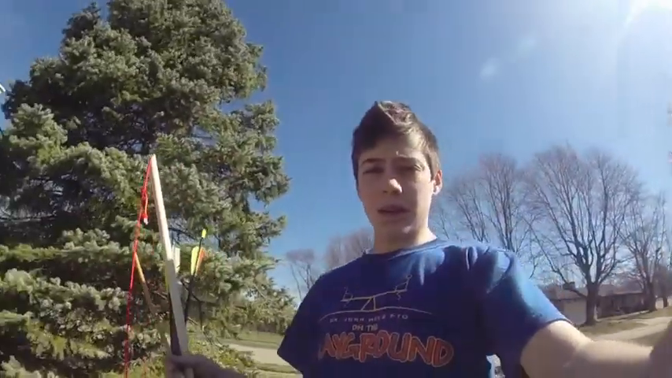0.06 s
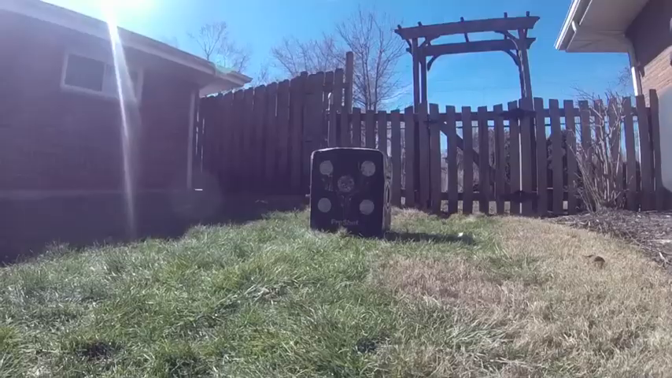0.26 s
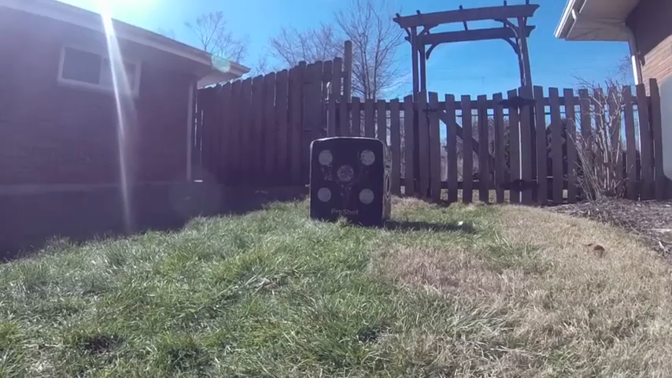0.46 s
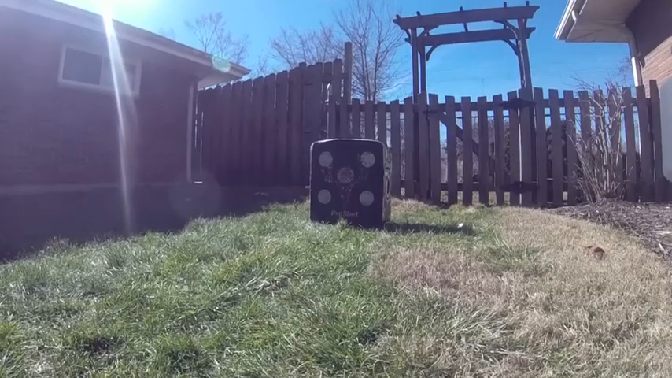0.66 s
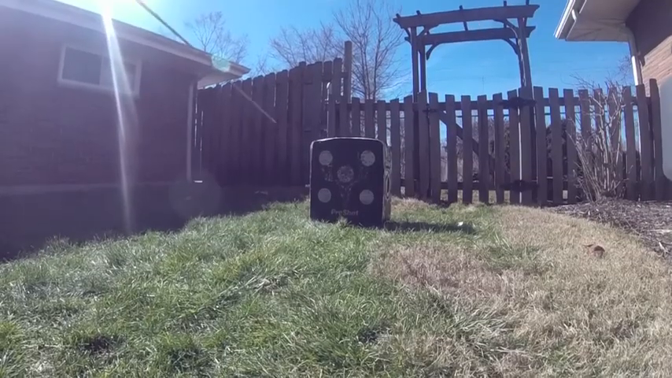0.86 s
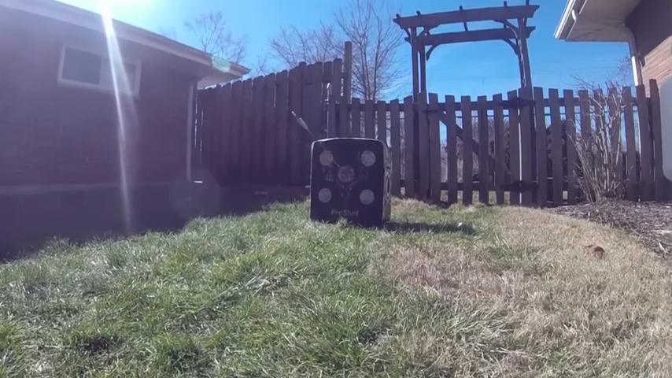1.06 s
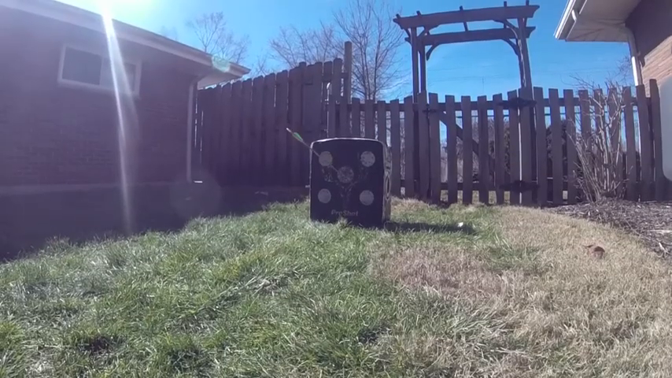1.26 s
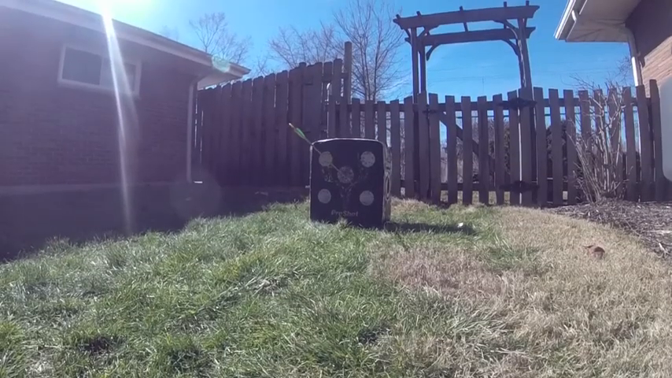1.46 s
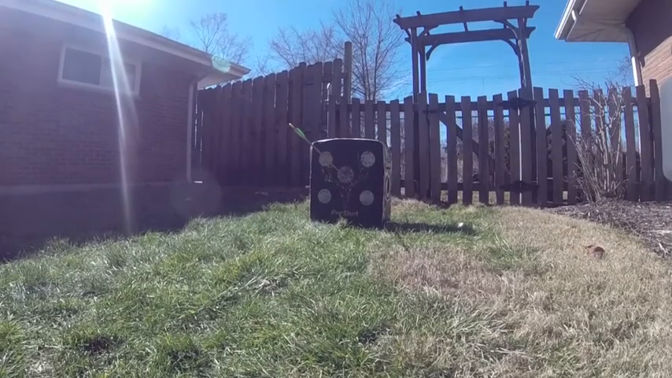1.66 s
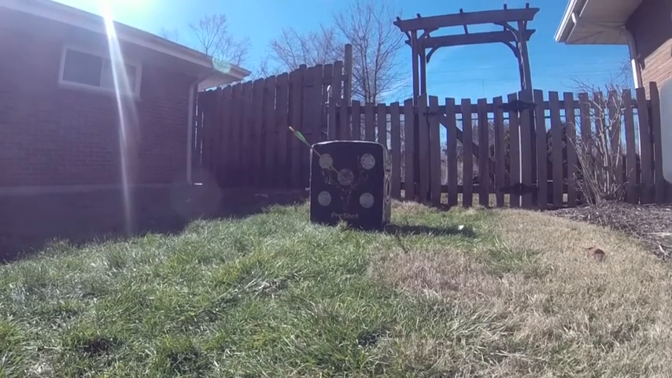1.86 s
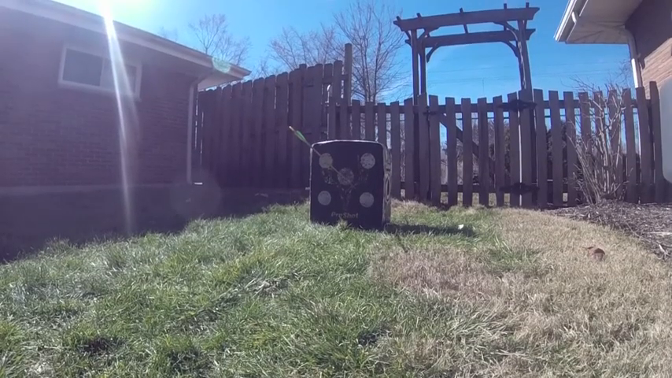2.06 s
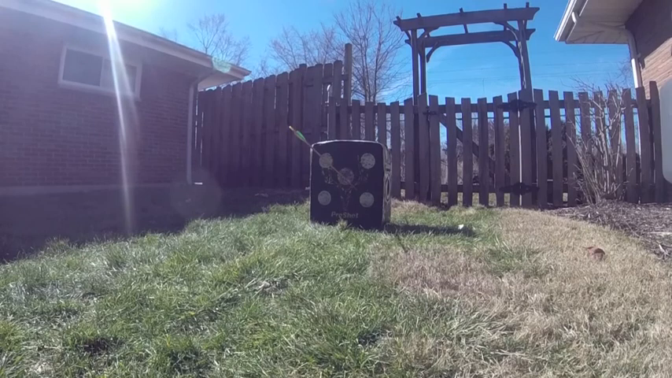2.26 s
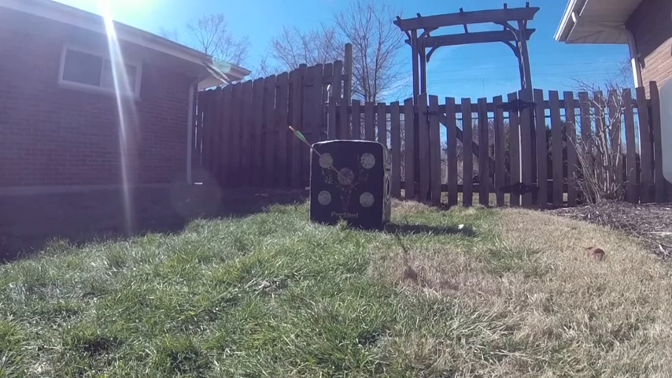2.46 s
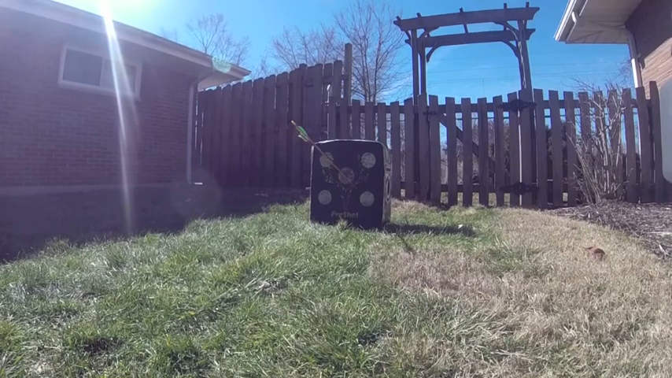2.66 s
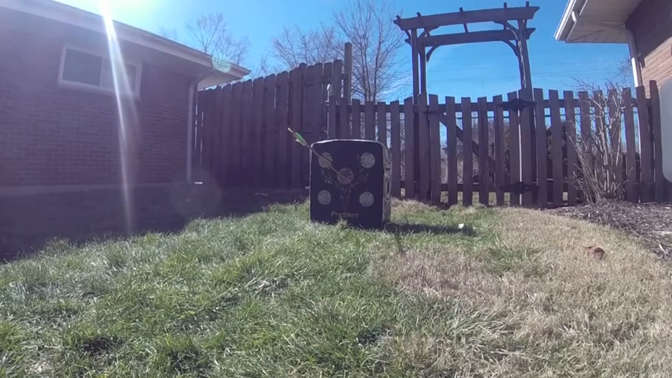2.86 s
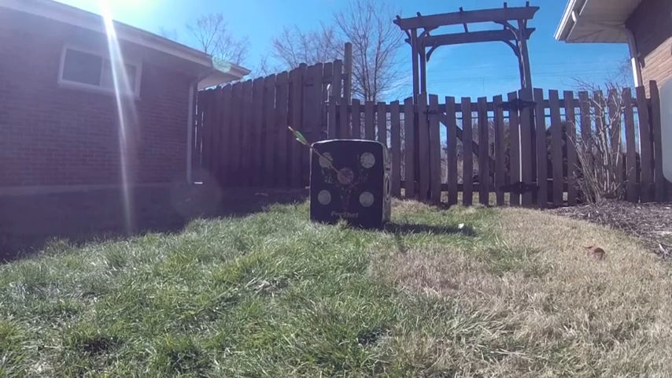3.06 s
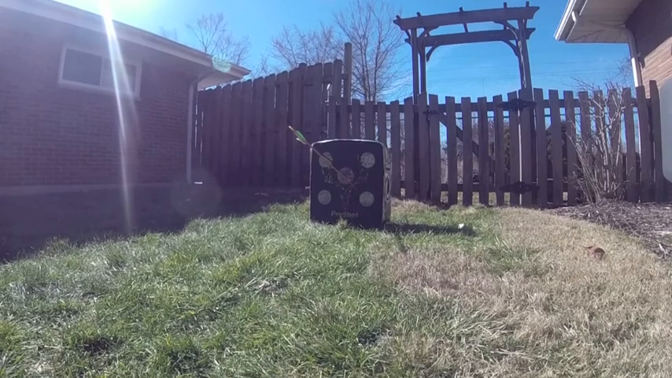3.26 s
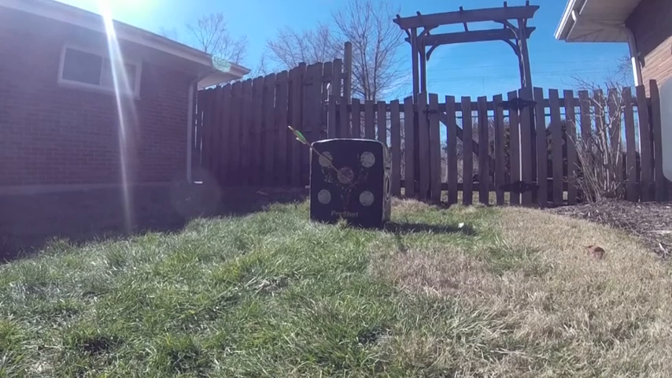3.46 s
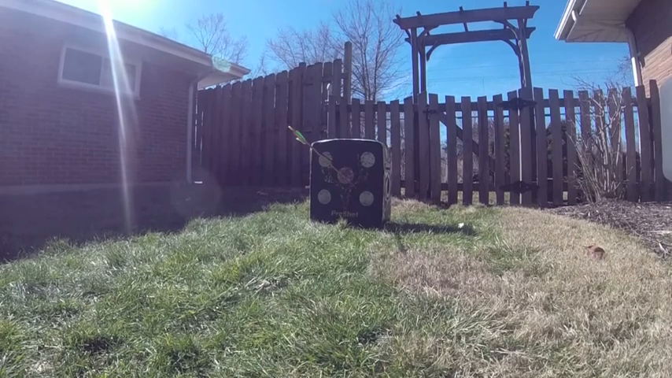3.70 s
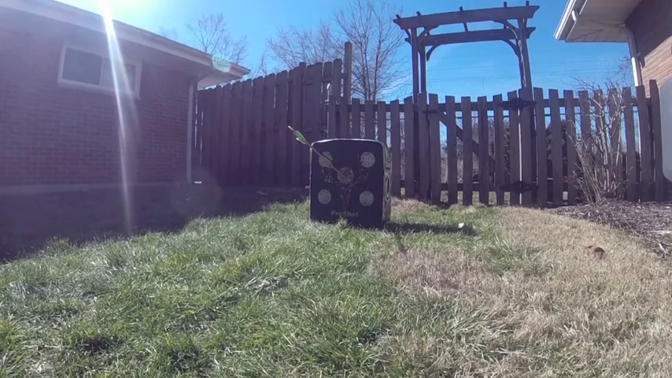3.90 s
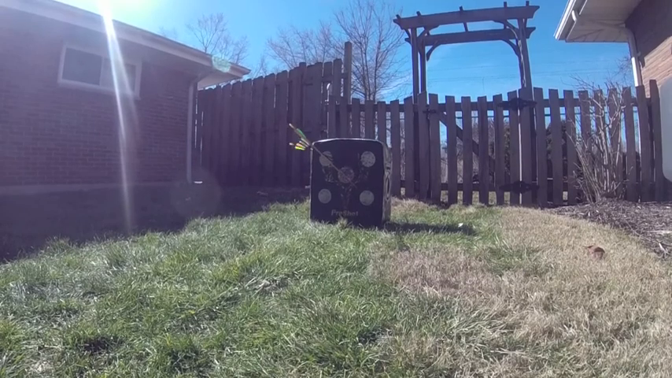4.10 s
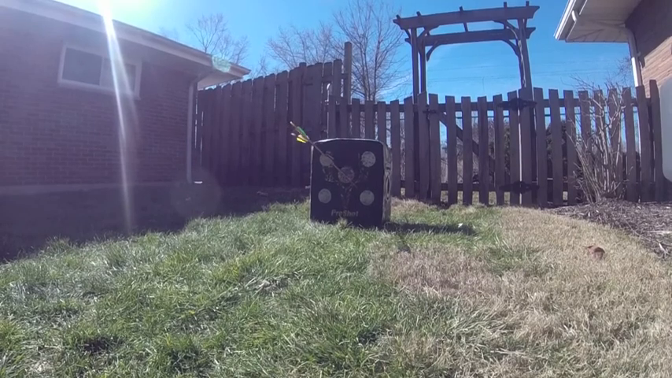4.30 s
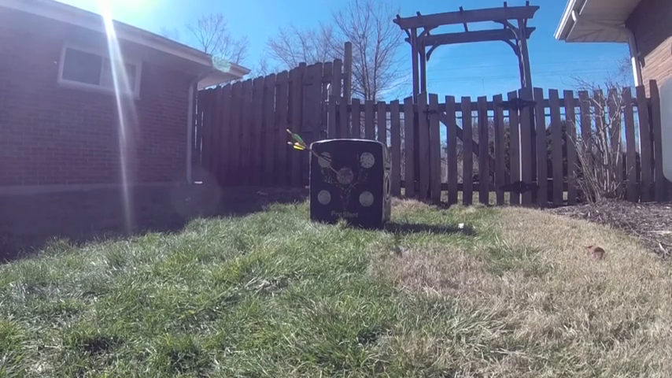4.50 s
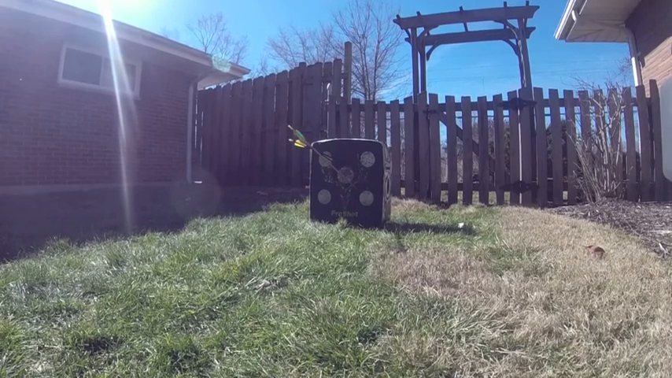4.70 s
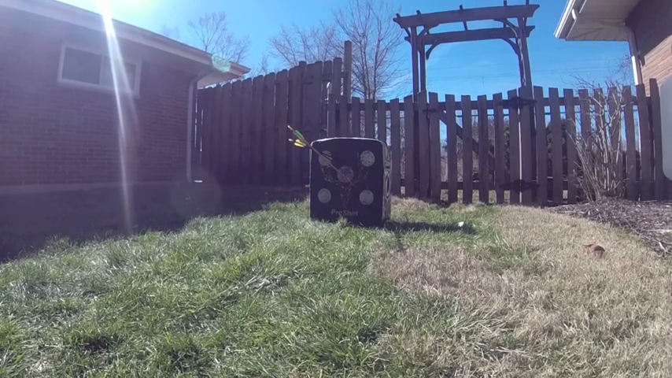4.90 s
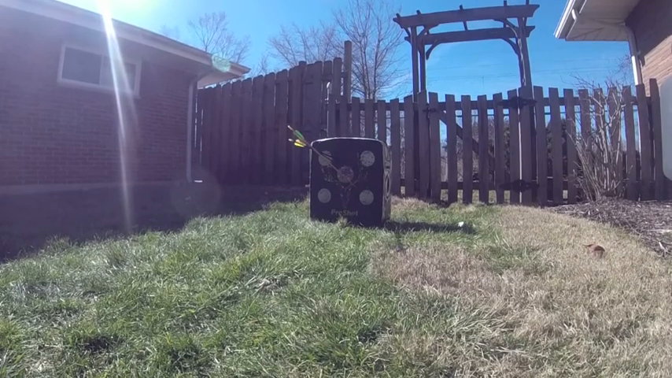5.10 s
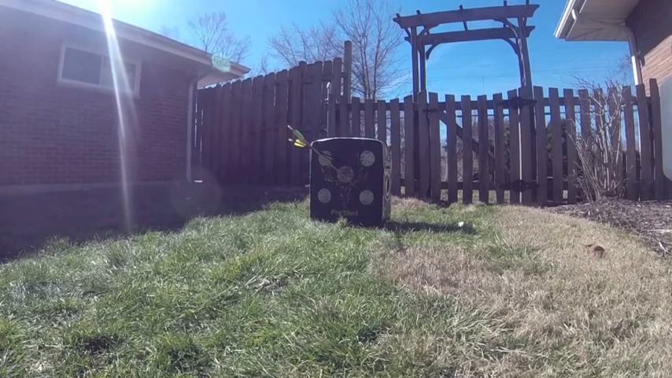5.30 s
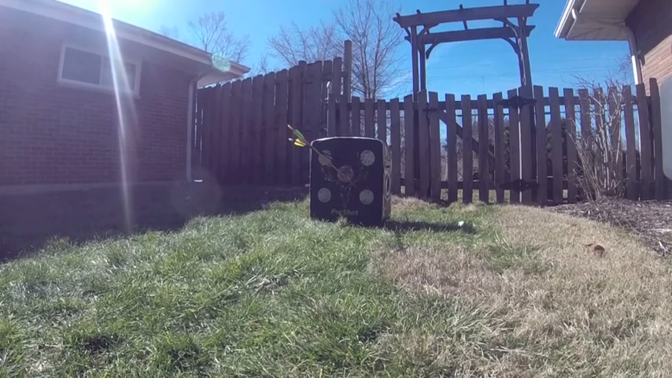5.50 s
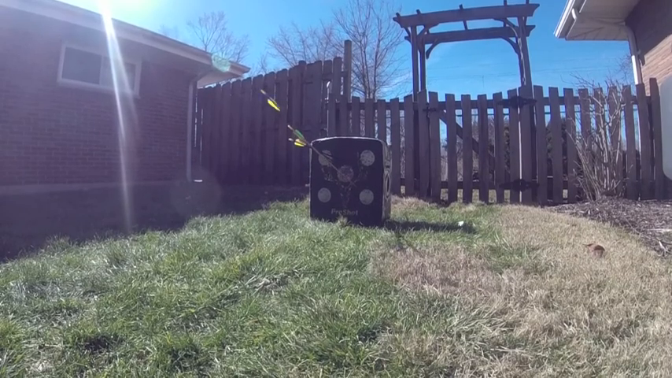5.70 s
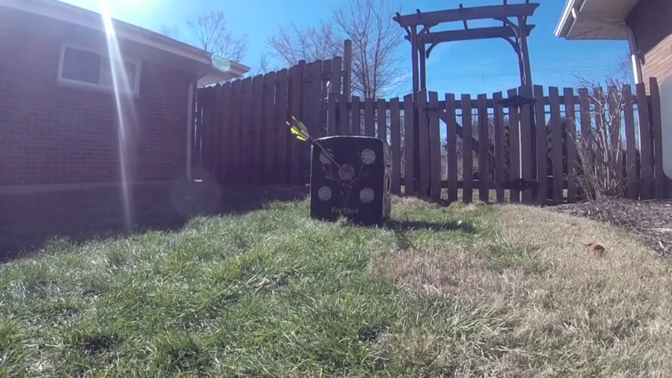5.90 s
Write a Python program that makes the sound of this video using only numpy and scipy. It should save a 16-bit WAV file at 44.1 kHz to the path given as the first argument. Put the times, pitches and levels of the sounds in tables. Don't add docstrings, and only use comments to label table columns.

```python
import sys
import numpy as np
from scipy import signal
from scipy.fft import rfft, irfft
from scipy.io import wavfile
from scipy.ndimage import uniform_filter1d

SR = 44100
rng = np.random.default_rng(int(sys.argv[2]) if len(sys.argv) > 2 else 0)


def pcm_store(signal):
    levels = np.round(np.clip(np.atleast_2d(signal), -1, 1) * 32767)
    wavfile.write(sys.argv[1], SR, levels.astype(np.int16).T)


def invert_db(x):
    u = np.asarray(x, float) / 20
    return 10 ** u


N = 262350

# (time [s], peak level [dB], favoured ring [Hz])
BOW_KNOCKS = [(0.7988, -49, 2650), (0.8203, -35, 3340), (0.8245, -23, 3350), (0.8347, -33, 3060),
              (0.8438, -31, 2300), (0.8535, -27.5, 3500), (0.86, -37, 2770), (2.3915, -36, 2410),
              (2.4001, -26, 1650), (2.4184, -32, 3170), (2.4283, -23, 3160), (2.434, -37, 4700),
              (2.4505, -40, 3040), (2.4614, -44, 4500), (3.9474, -40, 3370), (3.9558, -27.5, 3290),
              (3.9615, -34, 2250), (3.9754, -37, 3360), (3.9853, -35.5, 2150), (4.0044, -46, 2860),
              (5.5734, -48.5, 1620), (5.585, -39.5, 3480), (5.5934, -34.5, 2250), (5.5984, -26, 2160),
              (5.6116, -40, 2320), (5.6214, -41, 2290), (5.6354, -46, 2710)]
# (frequency [Hz], width [Hz], level [dB])
BOW_MODES = [(1330, 190, -16.5), (1650, 194, -6.5), (2210, 210, -0.5), (2750, 310, -1.5), (3416, 197, 3),
             (4026, 300, -11), (4700, 270, -2.5), (5630, 440, -1.5), (5900, 360, -0.5), (6670, 640, -8.5),
             (8380, 1100, -17), (11050, 1500, -21), (12800, 1800, -30)]
KNOCK_MS, HARD_MS_PER_DB = 4.0, .25
SCRAPE_SHARE = .35
BOW_TILT_DB, STRING_RING_HZ = .2, 5500


def bow_release():
    s, db, hz = np.transpose(BOW_KNOCKS)
    gap_ms = np.diff(s, append=9) * 1000
    harder_next = np.diff(db, append=-99) > 0
    scrape_ms = SCRAPE_SHARE * gap_ms * (harder_next & (gap_ms < 30))
    length_ms = KNOCK_MS + HARD_MS_PER_DB * np.clip(db + 32, 0, 8) + scrape_ms
    knocks = [(*row[:3], BOW_TILT_DB, row[3], STRING_RING_HZ) for row in zip(s, db, length_ms, hz)]
    return contacts(knocks, BOW_MODES, rise_ms=0.43, grain_db=3.0, focus_db=5, treble_dies=0.31, abrupt=1.0)


# (time [s], level [dB])
SQUEAK_LEVEL = [(2.399, -56), (2.403, -31.5), (2.412, -27.5), (2.421, -32.5), (2.430, -44), (2.455, -70),
                (2.47, -73)]
# (frequency [Hz], level [dB])
SQUEAK_PARTIALS = [(3167, 0), (3895, -11), (4675, -12), (5480, -17), (2493, -19)]


def squeak():
    t = np.arange(SQUEAK_LEVEL[0][0] * SR // 1, SQUEAK_LEVEL[-1][0] * SR // 1) / SR
    out, tone = np.zeros(N), 0
    for hz, db in SQUEAK_PARTIALS:
        flutter = uniform_filter1d(rng.standard_normal(4096), size=90)[:len(t)]
        partial = np.sin(2 * np.pi * (hz * t + rng.random()))
        tone = tone + invert_db(db + 17 * flutter) * partial
    add(out, t[0], tone * invert_db(np.interp(t, *np.transpose(SQUEAK_LEVEL))))
    return out


# (time [s], peak level [dB], low favoured ring [Hz], high favoured ring [Hz])
FOAM_HITS = [
    (0.9297, -24.5, 3400, 4500),
    (2.5111, -24.5, 1700, 4700),
    (4.0788, -29, 2970, 5200),
    (4.0812, -29.5, 2870, 5360),
    (5.7338, -30, 3050, 4610),
    (5.738, -36, 2750, 4160),
]
# (frequency [Hz], width [Hz], level [dB])
FOAM_SKIN_MODES = [(1300, 1500, -3), (1970, 310, 1.5), (2944, 300, 0.5), (3600, 390, -7),
                   (4410, 500, -11.5), (5600, 520, -11.5), (6700, 570, -22.5), (9100, 2200, -34.5),
                   (12300, 2400, -41.5)]
SMACK_MS, SMACK_TILT_DB = 3.6, 8.0


def foam_smack():
    hits = [(s, db, SMACK_MS, SMACK_TILT_DB, *rings_hz) for s, db, *rings_hz in FOAM_HITS]
    return contacts(hits, FOAM_SKIN_MODES, rise_ms=1.5, grain_db=3.5, focus_db=5.5, treble_dies=0.15, abrupt=1.28)


# (time [s], peak level [dB], first heave of its face [pressure], second heave [pressure])
BLOCK_THUDS = [
    (.929, -42, .036, .003),
    (2.511, -40, .011, .009),
    (4.0795, -40, .009, -.003),
    (5.734, -45, -.013, .006),
]
# (frequency [Hz], width [Hz], level [dB])
BLOCK_MODES = [(85, 57, 0.5), (140, 140, -4.5), (262, 180, -1), (490, 240, -4.5), (895, 300, -3),
               (1400, 540, -18)]
HEAVE_LATE_S, HEAVE_AGAIN_S, HEAVE_RISE_MS, HEAVE_FALL_MS = .009, .004, .68, .56


def block_thuds():
    out, n, heaves = np.zeros(N), np.arange(6000), []
    braking = (n / ms(5.9)) ** 1.62 * np.exp(-n / ms(4.7))
    rocking = 0.2 * np.exp(-n / ms(22.0))
    impact = 0.5 * np.exp(-n / ms(2.5))
    for s, db, first, second in BLOCK_THUDS:
        shoves = signal.lfilter([1], [1, -.9], rng.standard_normal(6000))
        drive = shoves * (braking + rocking + impact)
        sound = resonate([drive], BLOCK_MODES, rng.standard_normal(len(BLOCK_MODES)))
        add(out, s, invert_db(db) * sound / np.abs(sound).max())
        heaves.append((s + HEAVE_LATE_S, first, HEAVE_RISE_MS, HEAVE_FALL_MS))
        heaves.append((s + HEAVE_LATE_S + HEAVE_AGAIN_S, second, HEAVE_RISE_MS, HEAVE_FALL_MS))
    swing_back = signal.butter(2, 110, "high", fs=SR, output="sos")
    return out + signal.sosfilt(swing_back, pushes(heaves))


# (time [s], peak level [dB], favoured ring [Hz])
SHAFT_TAPS = [(0.8994, -34, 3430), (4.1002, -25, 5310), (4.1035, -26, 5320), (4.126, -31, 5210),
              (4.1314, -35, 2850), (4.157, -36.5, 4700), (4.1761, -32.5, 4470), (5.7804, -45, 2910),
              (5.7908, -42, 2800), (5.8084, -43.5, 2900), (5.8305, -34, 4610), (5.8535, -35.5, 5240),
              (5.9225, -37, 5250), (5.9414, -41, 5260)]
# (frequency [Hz], width [Hz], level [dB])
SHAFT_MODES = [(2880, 470, -6.5), (3570, 900, -8), (4600, 610, -2.5), (5300, 290, 1.5), (6040, 670, -7),
               (7100, 990, -14), (8750, 110, -7), (10400, 1800, -23), (12500, 2000, -25.5)]
TAP_MS, TAP_TILT_DB = 3.4, -2.5


def shaft_rattle():
    taps = [(s, db, TAP_MS, TAP_TILT_DB, hz) for s, db, hz in SHAFT_TAPS]
    return contacts(taps, SHAFT_MODES, rise_ms=0.24, grain_db=3.0, focus_db=2.5, treble_dies=0.46, abrupt=1.2)


def walls(x, echo_db, t60):
    n = np.arange(9000)
    onset = np.clip((n - ms(2.5)) / ms(3.8), 0, 1)
    scatter = rng.standard_normal(9000) * invert_db(-60 * n / (t60 * SR)) * onset
    scatter = signal.lfilter([1], [1, -.65], scatter)
    return x + invert_db(echo_db) * signal.fftconvolve(x, scatter / np.linalg.norm(scatter))[:N]


SCENE_CHANGES = [
    .188,
    1.860,
    3.496,
    4.962,
]
FADE_OUT_S, FADE_IN_S = .097, .092


def fades(bend):
    t, gain = np.arange(N) / SR, np.ones(N)
    for s in SCENE_CHANGES:
        gain *= np.clip(np.maximum((s - t) / FADE_OUT_S, (t - s) / FADE_IN_S), 0, 1) ** bend
    return gain * (t > SCENE_CHANGES[0])


# (time [s], pressure, rise [ms], fall [ms])
DOME_SNAPS = [
    (.00366, -0.75, 0.17, 0.165),
    (.0036, -.12, .5, .3),
    (.0043, -0.44, 0.45, 1.44),
    (0.1203, 0.09, 0.11, 0.15),
    (.12904, -0.25, 0.042, .035),
    (.12913, 0.21, 0.044, 0.039),
]
# (time [s], pressure, rise [ms], fall [ms])
FINGER_LIFT = [
    (.1195, -0.052, 6, 1.64),
    (.126, 0.038, 7.1, 14),
]
# (time [s], height, frequency [Hz], t60 [ms])
CAP_RINGS = [
    (.00402, -.5, 2150, 8.5),
    (.00400, -.56, 1680, 5.5),
    (.0036, 0.0082, 2900, 10),
    (0.0052, .02, 1300, 30),
    (.1204, .03, 1900, 5),
    (.1294, 0.045, 2280, 9.6),
    (.1294, 0.017, 1260, 28),
]
# (frequency [Hz], level [dB], t60 [s])
HAND_SWAY = [
    (27.4, -17.6, .18),
    (6.7, -25, .36),
]
SWAY_S = .003
# (frequency [Hz], width [Hz], level [dB])
HOUSING_MODES = [(600, 600, -16.5), (1280, 90, -3.5), (2500, 220, -1), (4400, 2000, -14),
                 (6000, 2000, -16.5), (9000, 4000, -27.5), (13000, 2500, -31.5)]
# (time [s], peak level [dB], length [ms], tilt [dB per octave])
SNAP_CRACKLE = [
    (.0042, -33, 4.5, -13),
    (.1206, -33, 0.86, -7),
    (.1297, -19, .8, 0.1),
]
# (frequency [Hz], width [Hz], level [dB])
SNAP_MODES = [(600, 360, -12), (1300, 300, -4), (2300, 900, -0.5), (3600, 990, -4), (5440, 2500, -1.5),
              (8500, 1800, -6), (13000, 2500, -16)]
DIP_LATE_S, DIP_MS = .006, 4.5
HANDLING_END_S = 0.1738


def handling():
    dips = [(s + DIP_LATE_S, size, DIP_MS, DIP_MS) for s, _, _, size in FINGER_STROKES]
    t, out = np.arange(9000) / SR, pushes(dips + FINGER_LIFT + DOME_SNAPS)[:9000]
    sway = [(SWAY_S, invert_db(db), hz, 1000 * t60) for hz, db, t60 in HAND_SWAY]
    for s, size, hz, t60_ms in CAP_RINGS + sway:
        since = np.maximum(t - s, 0)
        onset = 1 - np.exp(-(since * 6300) ** 2)
        out += size * onset * invert_db(-60000 * since / t60_ms) * np.sin(2 * np.pi * hz * since)
    grains = rng.standard_normal(9000) * invert_db(2.2 * rng.exponential(1, 9000))
    rub = resonate([grains], HOUSING_MODES, np.zeros(len(HOUSING_MODES)))
    out += rubbing(t) * rub / rub.std()
    crackle = contacts(SNAP_CRACKLE, SNAP_MODES, rise_ms=0.06, grain_db=4.0, focus_db=-1, treble_dies=0.49, abrupt=1.2)
    return (np.pad(out, (0, N - 9000)) + crackle) * (np.arange(N) < HANDLING_END_S * SR)


# (start [s], length [s], level [dB], dip of pressure)
FINGER_STROKES = [
    (.023, .027, -54, -.022),
    (.071, .059, -54.5, -.03),
]
RUB_ATTACK_S, RUB_RELEASE_DB_PER_S, RUB_REST_DB = .005, 800, -76


def rubbing(t):
    gain = invert_db(RUB_REST_DB)
    for s, length, db, _ in FINGER_STROKES:
        swell = np.clip((t - s) / RUB_ATTACK_S, 0, 1)
        gain = gain + swell * invert_db(db - RUB_RELEASE_DB_PER_S * np.maximum(t - s - length, 0))
    return gain


# (frequency [Hz], level [dB per Hz])
YARD_SPECTRUM = [(12, -32), (20, -3), (77, 0.5), (183, -3.5), (229, -5), (303, -7), (413, -9), (1340, -15),
                 (2480, -17), (2850, -13.5), (3880, -21.5), (4600, -22), (13300, -38.5), (14900, -41.5),
                 (16200, -63)]
# (frequency [Hz], width [Hz], level [dB])
MIC_PORT = [(2876, 220, 0.2), (4800, 670, 1.2)]
YARD_DB = -58


def yard(patchy_db):
    hz, noise = np.fft.rfftfreq(N, 1 / SR), rfft(rng.standard_normal(N))
    points = np.array(YARD_SPECTRUM)
    noise *= invert_db(np.interp(np.log(hz + 1), np.log(points[:, 0]), points[:, 1]))
    for ring_hz, width, db in MIC_PORT:
        noise *= invert_db(db * np.exp(-((hz - ring_hz) / width) ** 2))
    octave, out = np.log2(hz + 1), 0
    for centre in np.arange(4, 15):
        drift = uniform_filter1d(rng.standard_normal(N // 512 + 2), size=9) * 3
        gain = invert_db(patchy_db * np.interp(np.arange(N) / 512, np.arange(len(drift)), drift))
        band = np.clip(1 - np.abs(octave - centre), 0, 1)
        out = out + gain * irfft(noise * band, N)
    return invert_db(YARD_DB) * out / out.std()


def contacts(events, modes, rise_ms, grain_db, focus_db, treble_dies, abrupt):
    out, n, hz = np.zeros(N), np.arange(4096), np.array(modes)[:, 0]
    for s, db, length_ms, tilt_db, *favoured in events:
        clicks = rng.standard_normal(4096) * invert_db(grain_db * np.minimum(rng.exponential(1, 4096), 4))
        lasting = ms(max(length_ms, .3)) * (3000 / hz[:, None]) ** treble_dies
        shape = (1 - np.exp(-n / ms(rise_ms))) * np.exp(-(n / lasting) ** abrupt)
        colour_db = tilt_db * np.log2(hz / 4000)
        for ring_hz in favoured:
            colour_db += focus_db * np.exp(-(np.log2(hz / ring_hz) / 0.17) ** 2)
        colour_db += 1.5 * rng.standard_normal(len(hz))
        sound = resonate(clicks * shape + 1e-18, modes, colour_db)
        add(out, s - .0006, invert_db(db) * sound / np.abs(sound).max())
    return out


def resonate(x, modes, offsets_db):
    out = 0
    for k, (hz, width, db) in enumerate(modes):
        r = np.exp(-np.pi * width / SR)
        poles = [1, -2 * r * np.cos(2 * np.pi * hz / SR), r * r]
        rung = signal.lfilter([1 - r, 0, r - 1], poles, x[k % len(x)])
        out = out + invert_db(db + offsets_db[k]) * (-1) ** k * rung
    return out


def pushes(rows):
    out, t_ms = np.zeros(N), np.arange(-2000, 2000) / ms(0.87)
    for s, size, rise_ms, fall_ms in rows:
        hump = size * np.exp(-(t_ms / np.where(t_ms < 0, rise_ms, fall_ms)) ** 2)
        start = int(s * SR) - 2000
        out[max(start, 0):start + 4000] += hump[max(-start, 0):]
    return out


def add(track, s, sound):
    i = int(round(s * SR))
    track[i:i + len(sound)] += sound[:N - i]


def ms(value):
    return value * SR / 1000


def scene():
    song = squeak()
    shots = walls(bow_release() + .5 * song, -16, 0.18) + .5 * song
    shots = shots + walls(foam_smack(), -15.5, 0.18)
    shots = shots + walls(block_thuds(), -12.5, 0.25)
    shots = shots + walls(shaft_rattle(), -12.5, 0.2)
    return (handling() + (shots + yard(patchy_db=.9)) * fades(bend=1.14))[None]


def band_limit(x):
    return signal.sosfilt(signal.butter(12, 16370, fs=SR, output="sos"), x)


def record(dry):
    top_cut = signal.cheby2(10, 60, 16500, fs=SR, output="sos")
    mix = signal.sosfilt(top_cut, dry)
    return band_limit(mix)


dry = scene()
out = record(dry)
pcm_store(out)
```